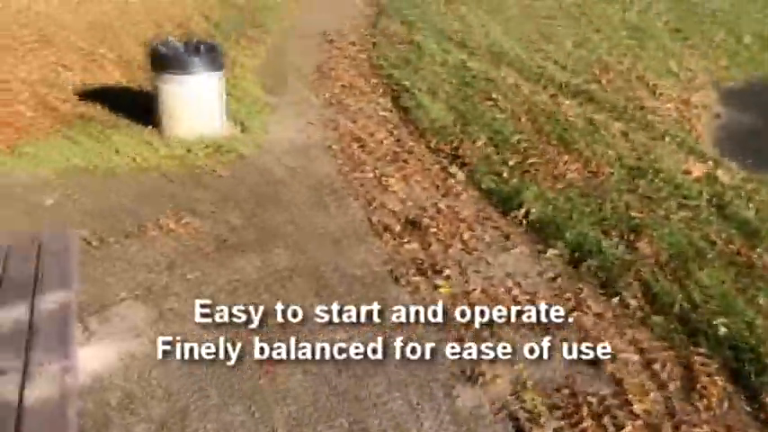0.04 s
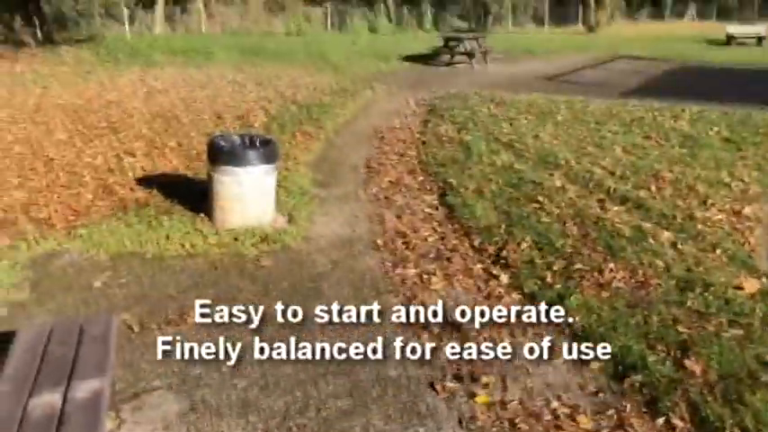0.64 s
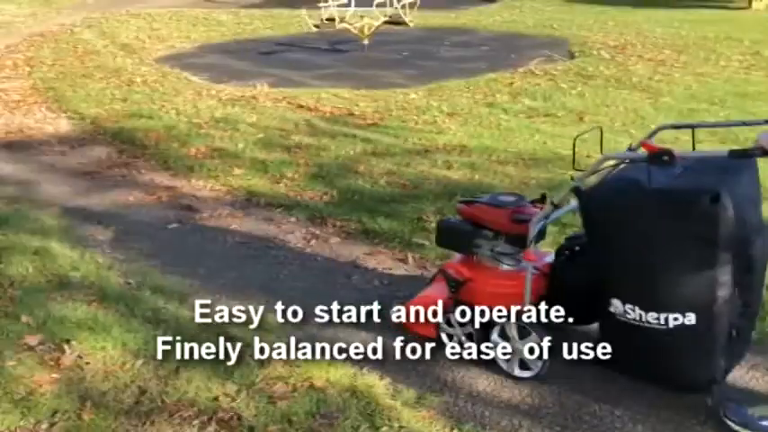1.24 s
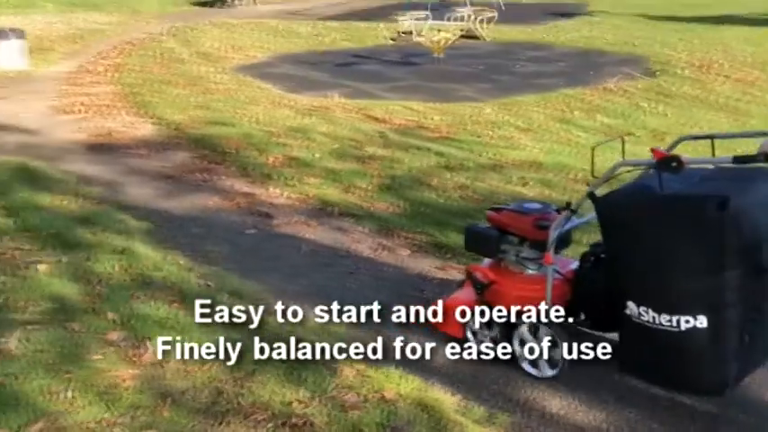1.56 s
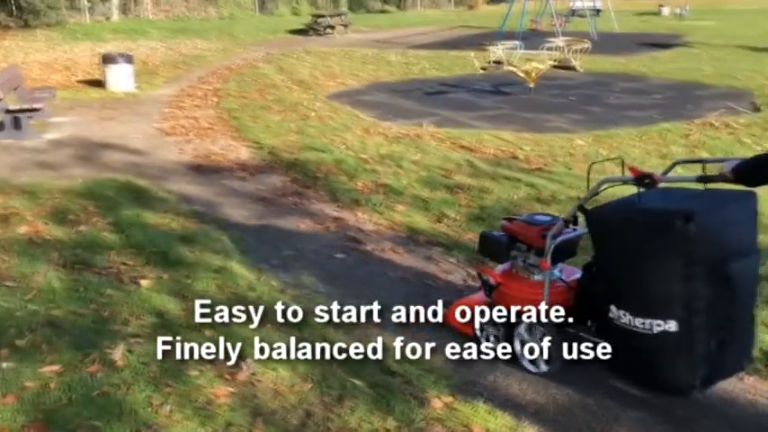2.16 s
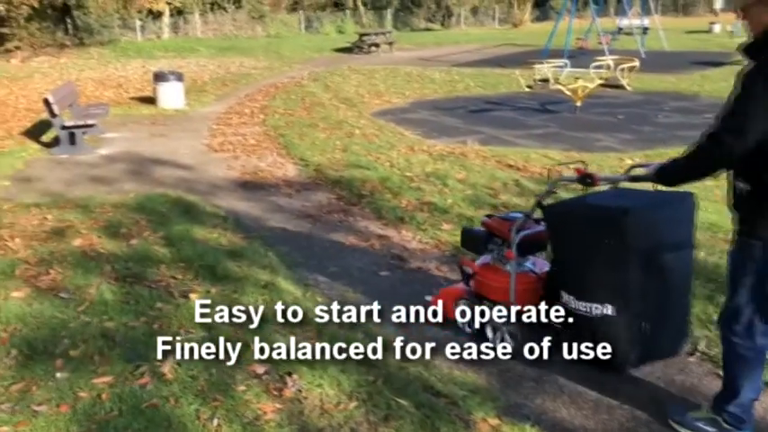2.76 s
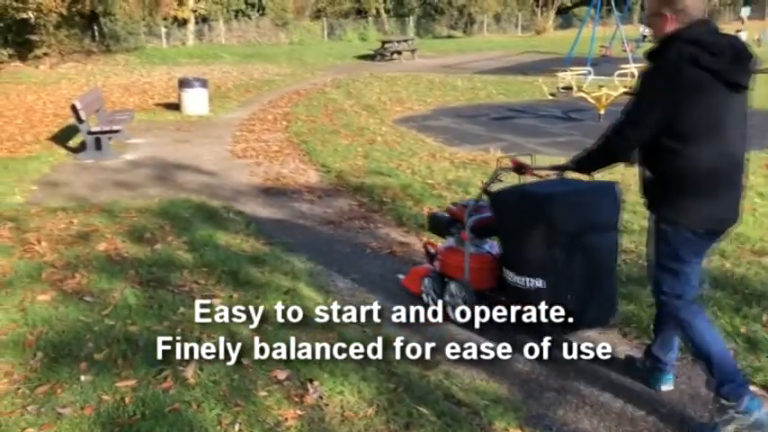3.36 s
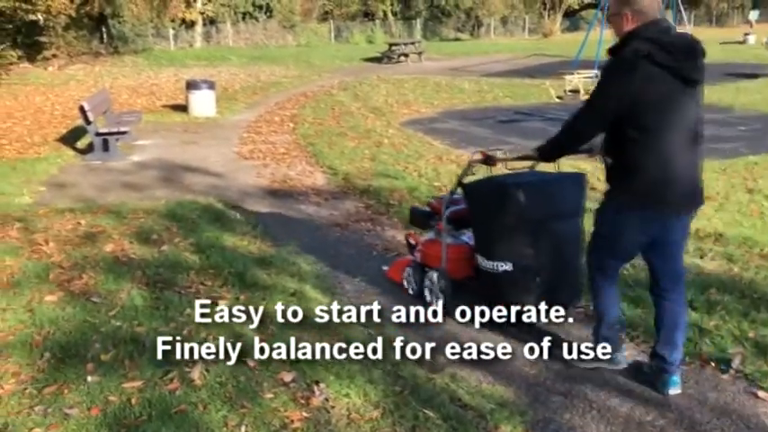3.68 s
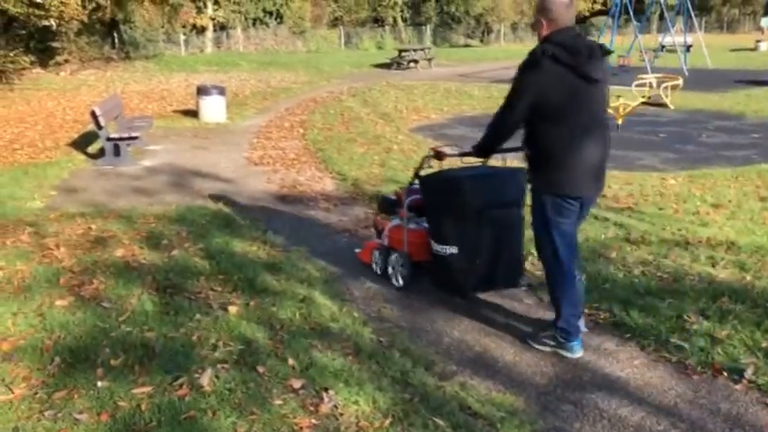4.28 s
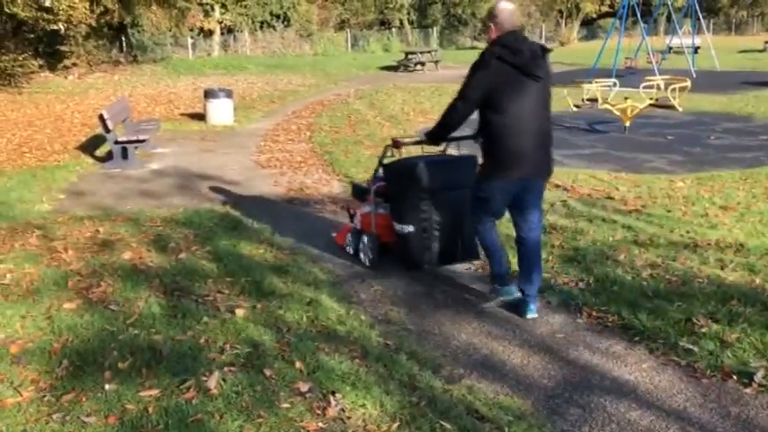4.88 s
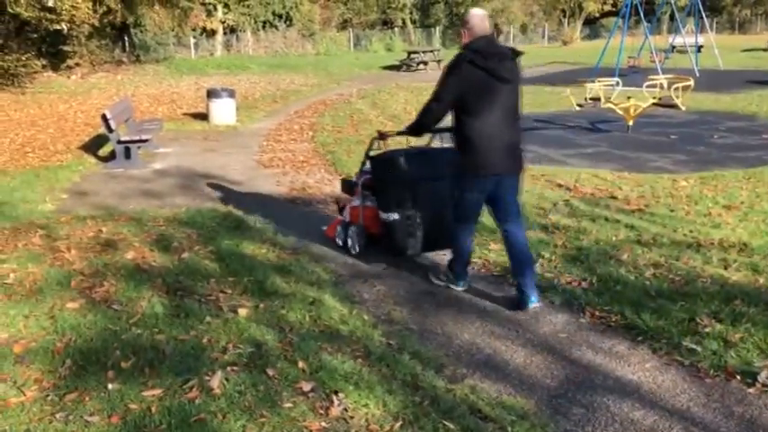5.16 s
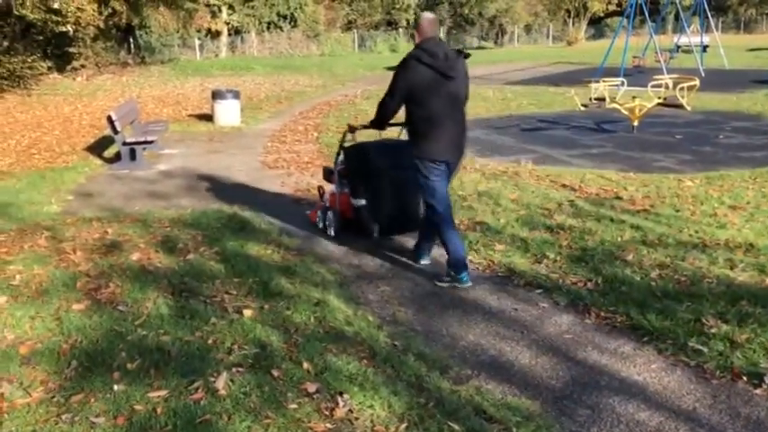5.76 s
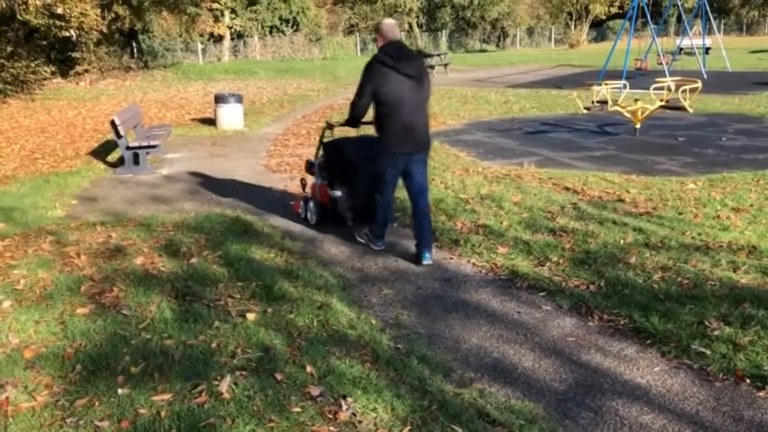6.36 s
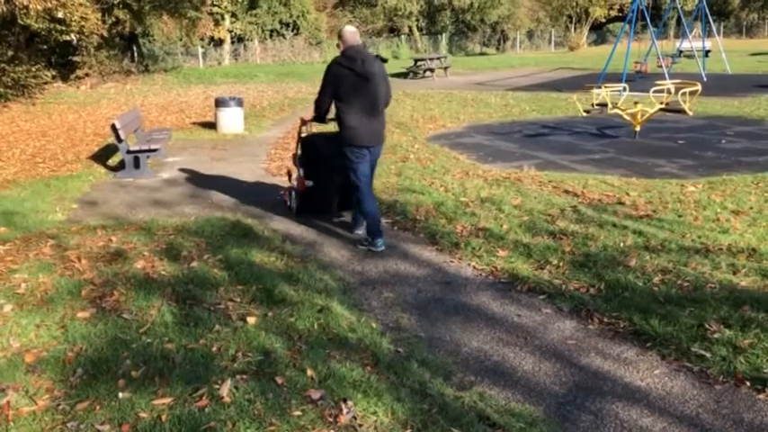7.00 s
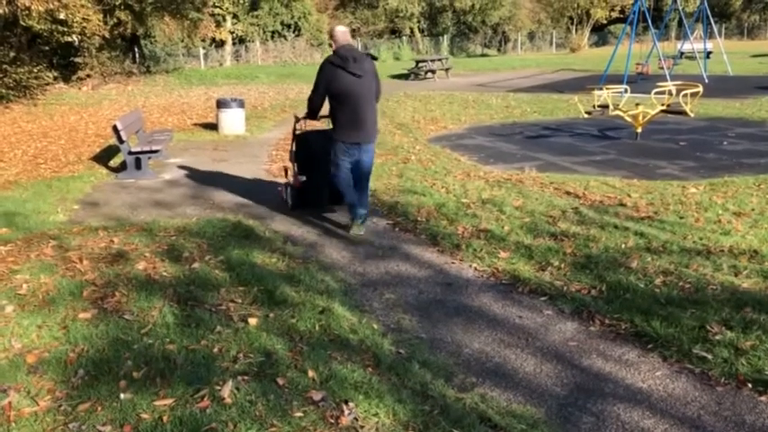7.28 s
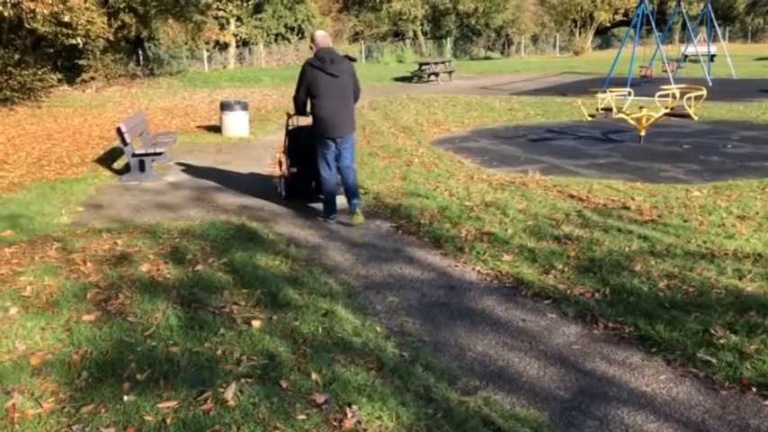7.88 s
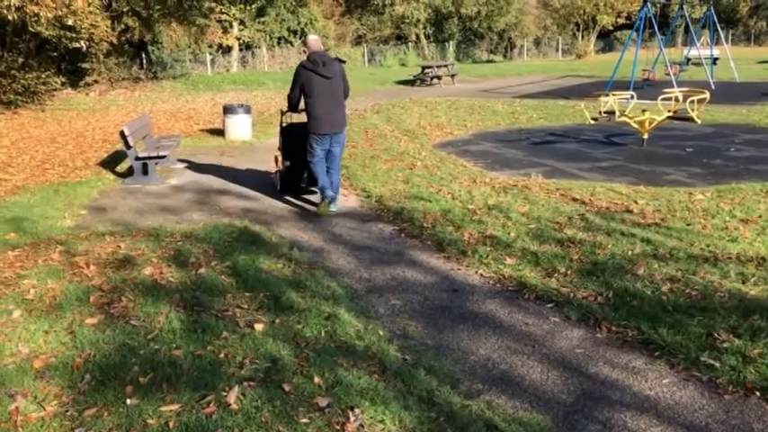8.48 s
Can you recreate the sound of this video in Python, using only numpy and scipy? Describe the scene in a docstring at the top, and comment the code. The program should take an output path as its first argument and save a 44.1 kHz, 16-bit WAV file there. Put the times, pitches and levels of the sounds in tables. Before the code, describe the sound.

Faint at first, a small petrol engine throbs under the steady hum of a leaf vacuum's fan. An abrupt cut a second in brings it right beside the microphone, loud with rushing, hissing air. As it is pushed away along an outdoor path, leaves crackle and grit rattles inside it, with irregular short crunches as clumps are shredded. The drone gradually gets softer but never stops.

```python
"""A petrol leaf vacuum is pushed along a park path, heard from a fixed microphone at head height.
At first it is far off: a single-cylinder four-stroke engine throbs under the impeller's blade tone.
After a second the sound breaks off for an instant and resumes two metres from the machine, with air
roaring into the bag. Leaves and grit crackle through the housing throughout, and from here on come
now and then in a louder gulp. The machine moves away to nine metres, heard more and more from behind."""
import sys
import numpy as np
from scipy import signal
from scipy.fft import rfft, irfft, next_fast_len
from scipy.io import wavfile
from scipy.ndimage import uniform_filter1d

SR = 44100
rng = np.random.default_rng(int(sys.argv[2]) if len(sys.argv) > 2 else 0)


def wrap_up_sound(samples):
    """Save the sound to the file named by the first command line argument, as 16-bit audio."""
    columns = np.atleast_2d(samples).T
    # keep every value between -1 and 1, then stretch to whole-number steps
    tamed = np.clip(columns, -1, 1)
    steps = np.round(tamed * 32767).astype(np.int16)
    wavfile.write(sys.argv[1], SR, steps)


N = 376613
TIME = np.arange(N) / SR
JUMP_S = 1.129   # from far off to close beside the machine
CLOSEST_S, CLOSEST_M, WALK_M_PER_S = 1.12, 1.976, 1.196


def from_db(db):
    return 10 ** (np.asarray(db) / 20)


def unit_rms(x):
    return x / np.sqrt(np.mean(x ** 2) + 1e-20)


def in_time(rows):
    """Columns of a curve, joined by straight lines."""
    seconds, *columns = np.transpose(rows)
    return [np.interp(TIME, seconds, column) for column in columns]


def drift(rate_hz):
    """Slow random wander of rms 1."""
    step = 32
    size = next_fast_len(N // step + 2)
    hz = np.arange(size // 2 + 1) * SR / (step * size)
    slow = irfft(rfft(rng.standard_normal(size)) / (1 + (hz / rate_hz) ** 2), size)
    return np.interp(np.arange(N) / step, np.arange(size), unit_rms(slow))


def coloured(x, hz, db, skirt_db=55):
    """Gives x a spectrum, with skirts falling by skirt_db an octave beyond its ends."""
    size = next_fast_len(N)
    octave, points = np.log2(np.arange(1, size // 2 + 2) * SR / size), np.log2(hz)
    outside = np.abs(octave - np.clip(octave, points[0], points[-1]))
    gain = from_db(np.interp(octave, points, db) - skirt_db * outside)
    return irfft(rfft(x, size) * gain, size)[:N]


def from_each_side(x, table):
    """One sound as it reaches the microphone from afar, from beside and from behind."""
    hz, *spectra = np.transpose(table)
    return np.array([coloured(x, hz, db) for db in spectra])


def resonate(x, modes):
    """Parallel resonances with alternating signs."""
    out = 0
    for k, (hz, width_hz, db) in enumerate(modes):
        r = np.exp(-np.pi * width_hz / SR)
        ring = signal.lfilter([1, 0, -1], [1, -2 * r * np.cos(2 * np.pi * hz / SR), r * r], x)
        out += (-1) ** k * from_db(db) * (1 - r * r) / 2 * ring
    return out


def grains(per_s, spread_db):
    """Random tiny impacts of unequal size."""
    sizes = from_db(spread_db * np.minimum(rng.exponential(1, N), 4))
    return unit_rms((rng.random(N) < per_s / SR) * sizes * rng.choice([-1, 1], N))


def clumps(rate_hz, depth_db):
    """Gain of a flow that arrives in quick lumps while its mean stays even."""
    gain = from_db(depth_db * np.clip(drift(rate_hz), -2, 2))
    return gain / np.sqrt(uniform_filter1d(gain ** 2, size=SR // 8))


def swell(cycle, at, width):
    """A smooth bump at one point of each engine cycle."""
    return np.exp(-.5 * (((cycle - at + .5) % 1 - .5) / width) ** 2)


def strokes(cycle, at, uneven_db):
    """One click per engine cycle, each a little different in strength."""
    return np.diff(np.floor(cycle - at), prepend=-1) * from_db(uneven_db * rng.standard_normal(N))


def far_then_near(far_db, near_db):
    """Gain from two levels, switched at the jump."""
    return from_db(np.where(TIME < JUMP_S, far_db, near_db))


def walk():
    """A straight walk: metres to the microphone, and the turn from beside (0) to behind (1)."""
    along = WALK_M_PER_S * (TIME - CLOSEST_S)
    distance = np.hypot(CLOSEST_M, along)
    return distance, (along / distance) ** 2


def over_ground(x, distance, mic_height_m=1.48, source_height_m=0.38, reflection=0.24, far_echo_s=0.001):
    """Direct sound plus the echo off the path: a shallow notch that climbs with distance."""
    direct_m = np.hypot(distance, mic_height_m - source_height_m)
    bounced_m = np.hypot(distance, mic_height_m + source_height_m)
    delay = np.where(TIME < JUMP_S, far_echo_s, (bounced_m - direct_m) / 343)
    return (x + reflection * np.interp(TIME - delay, TIME, x)) / np.hypot(1, reflection)


# Spectrum of a faint added noise. Each row: frequency in Hz, relative level in dB.
SIDE_SPECTRUM = [(800, 9.5), (1450, 11), (1900, -35), (3200, -43), (4000, 6), (5800, -13.5)]

def stereo_spread(gain, level_db=-22.0):
    """A faint added noise, opposite in the two channels, slightly widens the sound."""
    side = unit_rms(coloured(rng.standard_normal(N), *np.transpose(SIDE_SPECTRUM)))
    return from_db(level_db) * gain * side * [[1], [-1]]


# Air and leaves in the impeller housing. Each row: frequency in Hz, relative dB far, beside, behind.
HOUSING_SPECTRA = [(1535, -1, -5.5, 0.5), (1810, 1.5, -6, -3), (2240, 1, -1.5, -4.5),
                   (2770, -5.5, 0.5, -12.5), (3170, -2, 1, -5), (3540, -2, -4, -4.5),
                   (4100, -4, -5.5, -6.5), (4900, -5, -4, -10.5), (6300, -8.5, -6.5, -9),
                   (8000, -9, -10.5, -12), (9050, -10, -11, -10.5), (10050, -15, -10, -16),
                   (11540, -17, -13, -14.5)]

def in_housing(x, place):
    """The housing colours a sound made inside it, differently on each side."""
    return sum(weight * unit_rms(side) for weight, side in zip(place, from_each_side(x, HOUSING_SPECTRA)))


def air_hiss(cycle, place, far_db=-5.5, near_db=-5.0):
    """The air stream hisses and swells with each firing; from afar it has a second puff."""
    far = place[0]
    puff = 0.86 * far * swell(cycle, at=0.19, width=0.07)
    throb = 0.63 * swell(cycle, at=0.54, width=0.059)
    hiss = in_housing(rng.standard_normal(N) * (1 + puff + throb), place)
    return hiss * from_db(far_db * far + near_db * (1 - far))


# Air in the bag. Each row: frequency in Hz, then dB per Hz far, beside and behind.
BAG_SPECTRA = [(25, -77, -71, -70), (45, -72, -69, -79), (89, -68, -67, -66), (143, -65, -48.5, -54.5),
               (196, -60.5, -47.5, -55), (270, -57.5, -51.5, -61), (338, -62, -50.5, -64),
               (426, -66, -57, -55), (491, -67.5, -47.5, -56), (604, -68.5, -57.5, -58),
               (718, -68.5, -65, -57.5)]

def bag_roar(place, trim_db=0.05):
    """Turbulent air fills the bag."""
    white = rng.standard_normal(N) * np.sqrt(SR / 2)
    return from_db(trim_db) * np.sum(place * from_each_side(white, BAG_SPECTRA), axis=0)


def crumbs(place, level_db=-1.46, tilt_db_per_octave=4.5, q=5.8):
    """Dry crumbs snap in lumps, each at a pitch set by its size."""
    crackle = 0
    for hz in np.geomspace(2000, 11500, 10):
        snaps = grains(per_s=700, spread_db=1.0) * clumps(rate_hz=50, depth_db=2.0)
        crackle += resonate(snaps, [(hz, hz / q, tilt_db_per_octave * np.log2(hz / 2000))])
    return from_db(level_db) * in_housing(crackle * clumps(rate_hz=43, depth_db=3.5), place)


# Resonances of the impeller housing. Each row: frequency in Hz, width in Hz, relative level in dB.
HOUSING_MODES = [(1706, 170, -5), (1876, 91, 4.5), (2025, 195, -0.5), (3380, 400, -4), (3550, 95, 4),
                 (3840, 220, -1), (4500, 320, -15.5)]

def housing_ring(hits, turn, beside_tilt_db, behind_tilt_db):
    """The struck housing rings, tilted in dB per octave: from behind, the bag shades the upper modes."""
    tilt_db = beside_tilt_db * (1 - turn) + behind_tilt_db * turn
    return sum((-1) ** k * resonate(hits, [mode]) * from_db(tilt_db * np.log2(mode[0] / 2700))
               for k, mode in enumerate(HOUSING_MODES))


def grit_rattle(place, turn, beside_db=-6.5, behind_db=-5.2):
    """Grit flung against the housing keeps it ringing hollowly, heard only after the jump."""
    hits = grains(per_s=1500, spread_db=3.0) * clumps(rate_hz=23, depth_db=3.0)
    ring = housing_ring(hits, turn, beside_tilt_db=-1.0, behind_tilt_db=-4.5)
    return unit_rms(ring) * (from_db(beside_db) * place[1] + from_db(behind_db) * place[2])


# A clump being shredded. Each row: frequency in Hz, relative level in dB.
CRUNCH_SPECTRUM = [(4200, 3), (5500, 2), (7000, 3.5), (9200, 3.5), (12000, 0)]
# Clumps of leaves and twigs hit the impeller.
# Each row: start and length in seconds, then housing ring and crunch in relative dB.
CLUMP_HITS = [(1.915, 0.016, -25, -25), (1.972, 0.016, -14, -23), (1.998, 0.026, -25, -24.5),
              (2.147, 0.016, -24.5, -25.5), (2.224, 0.028, -33, -29), (2.324, 0.0064, -31, -20.5),
              (2.778, 0.013, -35, -28), (3.028, 0.01, -23.5, -26), (3.204, 0.011, -28, -28.5),
              (3.348, 0.0091, -29, -24.5), (3.398, 0.0069, -24, -26.5), (3.924, 0.023, -20, -24),
              (4.153, 0.0093, -23, -22), (4.22, 0.011, -19.5, -28), (4.428, 0.031, -24.5, -28.5),
              (4.604, 0.016, -27, -27.5), (4.649, 0.015, -27, -28), (4.814, 0.011, -26.5, -28),
              (4.943, 0.0092, -22.5, -27.5), (5.03, 0.01, -32, -30.5), (5.362, 0.047, -27, -30),
              (6.74, 0.013, -42, -27), (6.908, 0.014, -20, -25.5), (6.927, 0.025, -32, -34),
              (7.157, 0.019, -26, -29.5), (7.374, 0.016, -19, -19.5), (7.398, 0.017, -33, -33),
              (7.445, 0.026, -23.5, -27.5), (7.579, 0.02, -30, -30), (7.743, 0.0092, -31, -28.5),
              (8.47, 0.009, -31, -33)]

def gulps(turn, beside_rise_s=0.00056, behind_rise_s=0.0045, tail_s=0.0065, ring_db=-4.5, crunch_db=-0.63):
    """Each clump is shredded in a burst of impacts; its first crack is blunted when heard past the bag."""
    ring_gain, crunch_gain = np.zeros(N), np.zeros(N)
    for start, length, ring_level, crunch_level in CLUMP_HITS:
        span = slice(int(start * SR), int((start + .1) * SR))
        age, hidden = TIME[span] - TIME[span][0], turn[span]
        rise = np.minimum(age / (beside_rise_s * (1 - hidden) + behind_rise_s * hidden), 1)
        crack = 1 + 0.32 * (1 - hidden) * np.exp(-age / tail_s)
        shape = rise * crack * np.exp(-np.maximum(age - length, 0) / tail_s)
        ring_gain[span] += from_db(ring_level + ring_db) * shape
        crunch_gain[span] += from_db(crunch_level + crunch_db) * shape
    impacts = grains(per_s=7000, spread_db=0.5)
    ring = housing_ring(impacts * ring_gain, turn, beside_tilt_db=7.0, behind_tilt_db=-3.0)
    crunch = unit_rms(coloured(impacts, *np.transpose(CRUNCH_SPECTRUM)))
    return ring / np.std(resonate(impacts, HOUSING_MODES)) + crunch_gain * crunch


# Leaves entering the nozzle. Each row: time in seconds, flow as relative crackle level in dB.
LEAF_INTAKE = [(1.13, -30), (1.55, -32), (1.72, -25.5), (2.45, -30.5), (2.85, -27), (3.75, -30),
               (3.92, -25), (4.62, -26.6), (4.8, -32.5), (5.2, -24), (5.55, -25.5), (6.0, -34.5),
               (6.52, -30.5), (6.65, -25), (7.4, -23.5), (7.88, -32.5), (8.3, -25), (8.54, -32)]

def leaf_flow():
    """The flow of leaves swells and thins along the path, in dB."""
    return in_time(LEAF_INTAKE)[0]


def firing_rate(flow_db, free_hz=28.69, easing_hz_per_s=0.016, sag_hz=0.33, full_flow_db=-25, lag_s=0.18):
    """The governed engine slowly eases off and sags under the leaves; the flywheel makes the sag lag."""
    load = from_db(flow_db - full_flow_db)
    inertia = np.exp(-1 / (lag_s * SR))
    felt_load, _ = signal.lfilter([1 - inertia], [1, -inertia], load, zi=[inertia * load[0]])
    return free_hz - easing_hz_per_s * TIME - sag_hz * felt_load


# Engine metal rung by the valves. Each row: frequency and width in Hz, then level in dB far and beside.
VALVE_MODES = [(3595, 52, -73, -40.5), (3900, 92, -63, -46), (4460, 70, -58.5, -56), (8100, 900, -60, -52)]

def valves(cycle, place, buzz=0.0072):
    """The valve gear ticks once a cycle and buzzes between; the bag hides it from behind."""
    contacts = strokes(cycle, at=0.16, uneven_db=-1.0) + buzz * rng.standard_normal(N)
    return sum(unit_rms(resonate(contacts, [(hz, width_hz, 0)])) * (from_db(levels) @ place[:2])
               for hz, width_hz, *levels in VALVE_MODES)


# Resonances of the exhaust. Each row: frequency in Hz, width in Hz, relative level in dB.
EXHAUST_MODES = [(801, 93, 2.5), (1133, 76, 2), (1300, 120, -3), (1500, 210, -6)]
# Noise of the engine casing. Each row: frequency in Hz, then relative dB far, beside and behind.
CASING_SPECTRA = [(636, -2, -8, -2), (730, 3, -2, -11), (832, 1.5, 1, -3.5), (966, -6.5, -8, -5),
                  (1210, -3.5, 1.5, -5), (1426, -4, -5.5, -10.5), (1660, -10.5, -11, -11)]

def engine_clatter(cycle, place, bark_db=-9.0, casing_db=-1.5):
    """Every firing barks in the exhaust, over the noise of the casing."""
    bark = resonate(strokes(cycle, at=.4, uneven_db=2.5), EXHAUST_MODES)
    casing = np.sum(place * from_each_side(rng.standard_normal(N), CASING_SPECTRA), axis=0)
    return from_db(bark_db) * unit_rms(bark) + from_db(casing_db) * unit_rms(casing)


# The engine's tones. Each row: multiple of the firing rate, then level in dB far, beside and behind.
ENGINE_HARMONICS = [(2,-44.5,-43.5,-43), (3,-47,-40.5,-43.5), (4,-41,-43,-45.5), (5,-36.5,-32,-33),
                    (6,-42,-52,-47.5), (7,-54,-31,-35), (8,-47,-65,-46), (9,-57,-34.5,-35.5),
                    (11,-60,-43,-60), (12,-69,-45,-52), (13,-49.5,-50,-50.5), (14,-48,-62,-57),
                    (15,-59,-53,-70), (16,-65,-46,-41), (17,-61,-58,-56), (18,-67,-40,-47),
                    (19,-70,-51,-55), (21,-68,-52,-68), (22,-55,-49,-49), (24,-67,-56,-57),
                    (28,-66,-63,-52), (29,-49,-36.5,-48.5), (30,-57,-43,-50.5), (33,-61,-55,-61),
                    (35,-66,-41.5,-61), (39,-70,-49,-61), (40,-69,-40,-64), (41,-72,-60,-57),
                    (43,-59,-53,-53.5), (51,-63,-54,-60)]

def engine_throb(cycle, place, smear_rad=.21, waver_db=0.5):
    """Harmonics of the firing rate; the silencer smears each pulse, delaying the higher ones more."""
    pulses = 0
    for order, *levels in ENGINE_HARMONICS:
        phase = 2 * np.pi * order * cycle - smear_rad * order ** 2
        pulses += (from_db(levels) @ place) * np.cos(phase)
    return np.sqrt(2) * pulses * from_db(waver_db * drift(5.7))


# The impeller from afar. Each row: time in seconds, blade tone in dB, its octave in dB.
BLADE_LEVELS_FAR = [(0, -34, -37.5), (.6, -36.5, -42.5), (1.1, -32.5, -45.5)]
# The impeller at two metres. Each row: turn from beside (0) to behind (1), tone in dB, its octave in dB.
BLADE_LEVELS_NEAR = [(0, -13.5, -28), (.3, -13.4, -31.5), (.52, -14, -33), (.68, -14.4, -28),
                     (.88, -14, -23.5), (.96, -11.5, -19)]

def impeller(cycle, turn, loss_db, blades=5, flutter_db=0.2, octave_flutter_db=-0.3, sway_db=0.3):
    """The blades sound a loud tone that flutters in the uneven air flow and, from behind, sways."""
    turns, *near_levels = np.transpose(BLADE_LEVELS_NEAR)
    tone_gain, octave_gain = [
        far_then_near(far_db, np.interp(turn, turns, near_db) - loss_db + sway_db * turn * drift(2.8))
        for far_db, near_db in zip(in_time(BLADE_LEVELS_FAR), near_levels)]
    phase = 2 * np.pi * blades * 2 * cycle   # the shaft turns twice a firing
    tone = tone_gain * from_db(flutter_db * drift(12)) * np.cos(phase)
    octave = octave_gain * from_db(octave_flutter_db * drift(14)) * np.sin(2 * phase)
    return np.sqrt(2) * (tone + octave)


def scene(gap_s=0.0054, gap_fade_s=0.0048):
    """The machine at the microphone: the walk sets level and colour, the leaves load the engine."""
    flow_db = leaf_flow()
    cycle = np.cumsum(firing_rate(flow_db) * (1 + .001 * drift(9))) / SR
    distance, turn = walk()
    loss_db = 4 * np.log2(distance / CLOSEST_M)   # 4 dB per doubling over hard ground
    near = TIME >= JUMP_S
    place = np.array([1. - near, near * (1 - turn), near * turn])   # weights: far, beside, behind
    rush_gain = far_then_near(far_db=-42.5, near_db=-24.5 - loss_db)
    leaf_gain = far_then_near(far_db=-51.5, near_db=flow_db - loss_db)
    drone = engine_throb(cycle, place) + impeller(cycle, turn, loss_db) + valves(cycle, place)
    low_rush = over_ground(bag_roar(place) + rush_gain * engine_clatter(cycle, place), distance)
    hiss = rush_gain * air_hiss(cycle, place)
    leaves = leaf_gain * (crumbs(place) + grit_rattle(place, turn)) + gulps(turn)
    gap_gate = np.clip(np.maximum(JUMP_S - gap_s - TIME, TIME - JUMP_S) / gap_fade_s, 0, 1)
    return (drone + low_rush + hiss + leaves + stereo_spread(rush_gain)) * gap_gate


def record(dry):
    """The treble is cut steeply above 12.1 kHz."""
    return signal.sosfilt(signal.ellip(12, .1, 90, 12100, fs=SR, output="sos"), dry)


dry = scene()
out = record(dry)
wrap_up_sound(out)
```